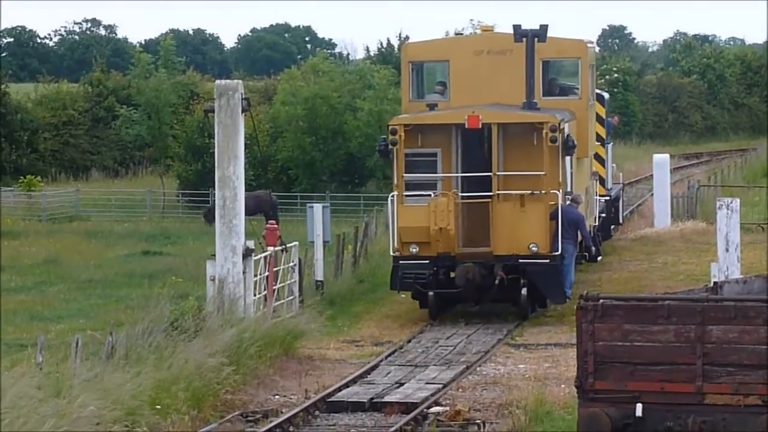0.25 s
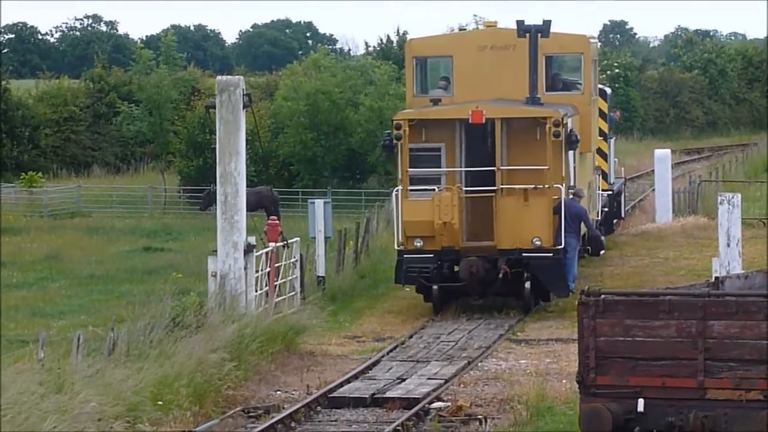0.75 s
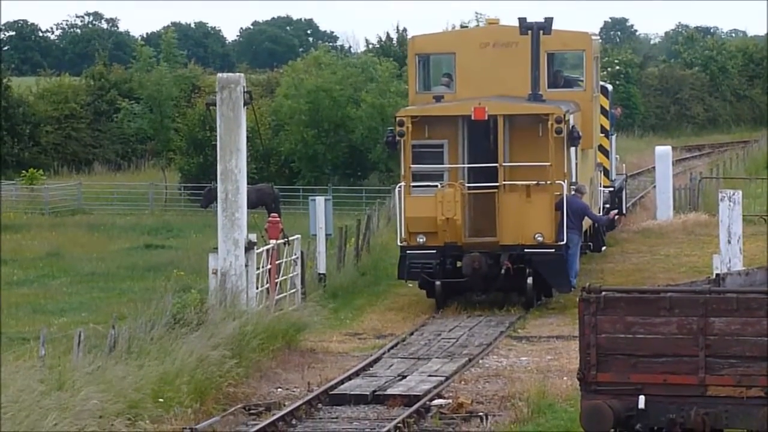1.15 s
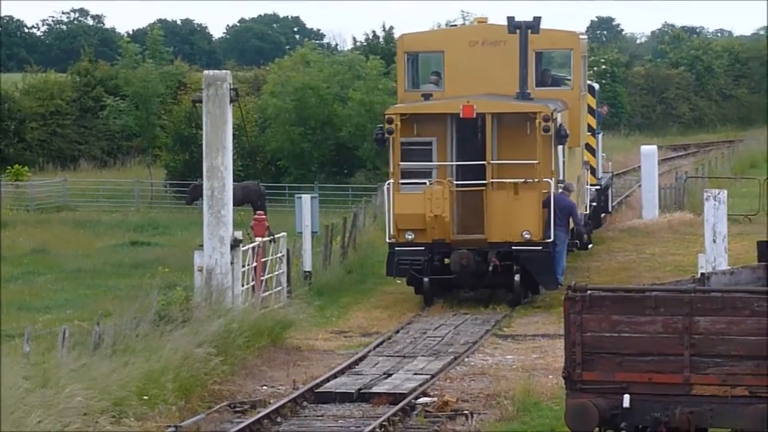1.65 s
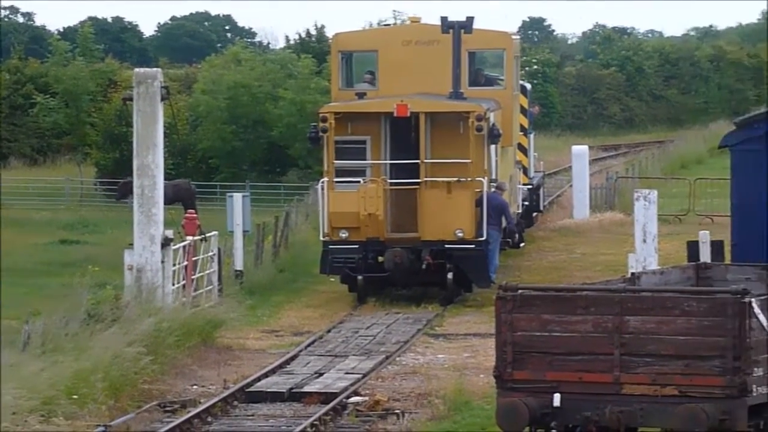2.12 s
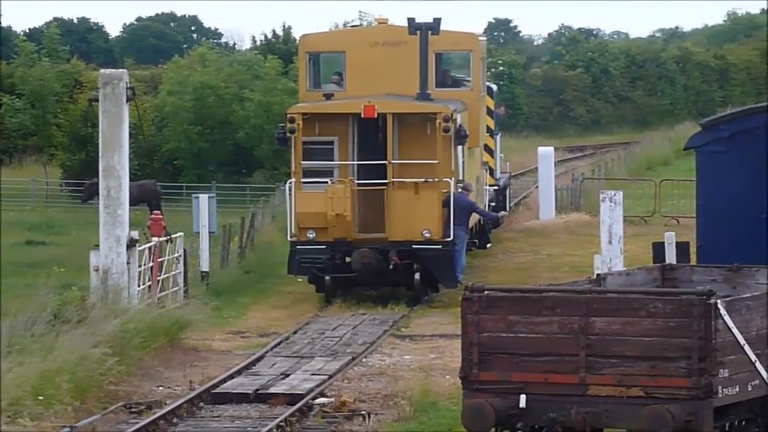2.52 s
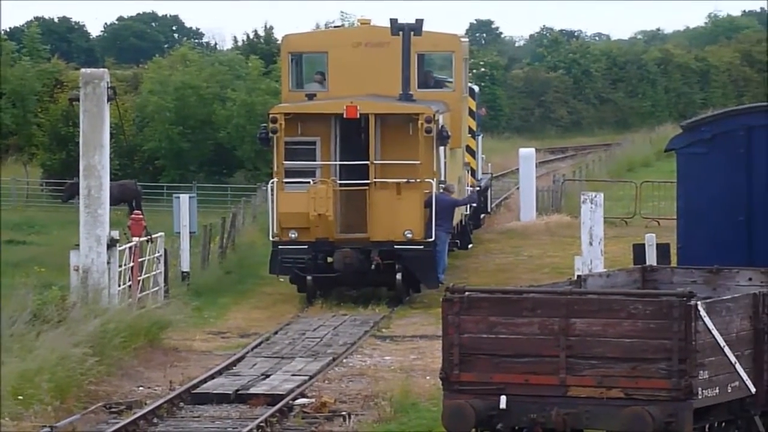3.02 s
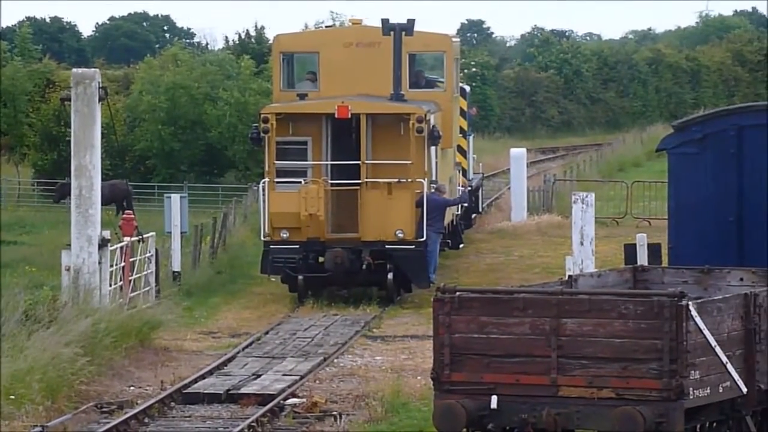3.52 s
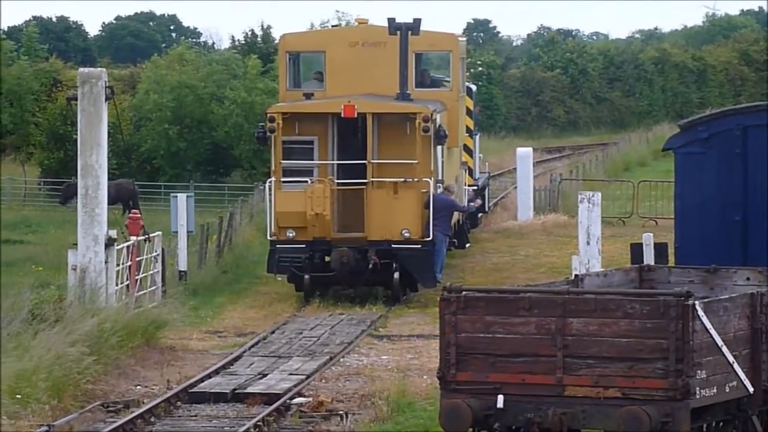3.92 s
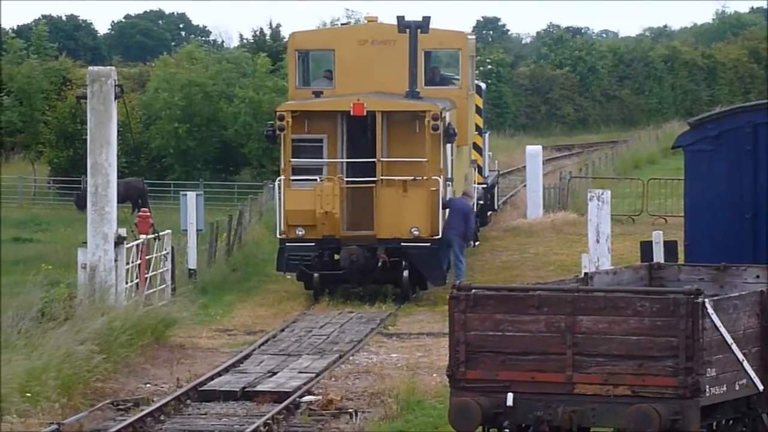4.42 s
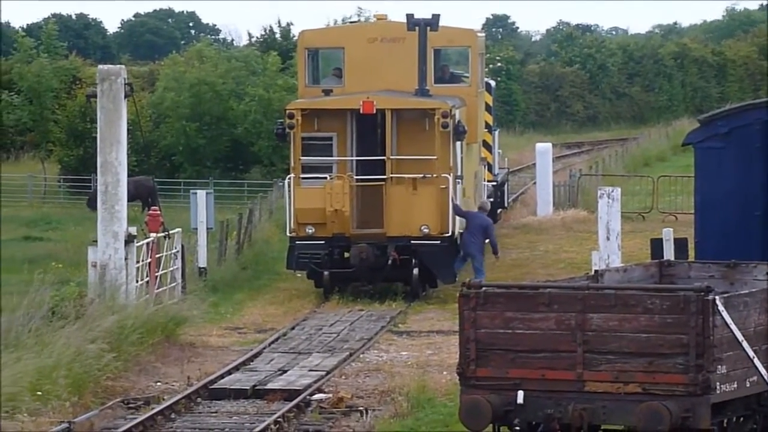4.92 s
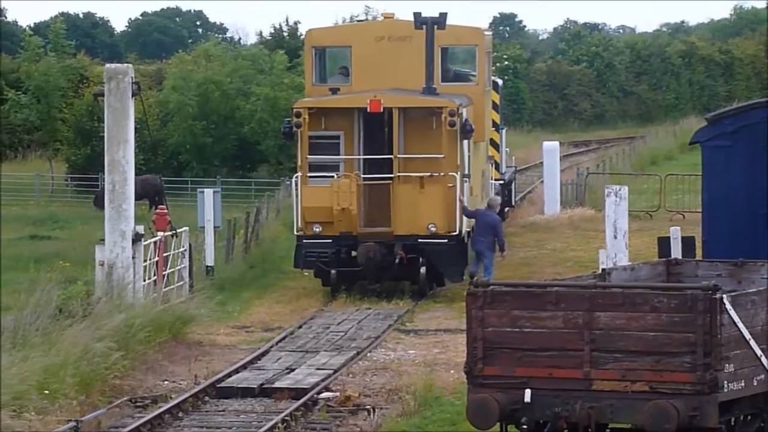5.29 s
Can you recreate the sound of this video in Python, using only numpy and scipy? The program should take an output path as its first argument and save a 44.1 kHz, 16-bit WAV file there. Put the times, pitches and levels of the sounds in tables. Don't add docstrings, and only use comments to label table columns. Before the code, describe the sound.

Faint air puffs, metallic rattles and clicks over a distant engine idle, then a loud, steady hiss of venting brake air from a standing locomotive.

```python
import sys
import numpy as np
from scipy import signal
from scipy.fft import rfft, irfft, next_fast_len
from scipy.io import wavfile
from scipy.ndimage import uniform_filter1d, map_coordinates

SR = 44100
rng = np.random.default_rng(int(sys.argv[2]) if len(sys.argv) > 2 else 0)


def generate_wav(signal):
    frames = np.transpose(np.atleast_2d(signal))
    scaled = np.clip(frames, -1, 1) * 32767
    pcm = np.round(scaled).astype(np.int16)
    wavfile.write(sys.argv[1], SR, pcm)


def magnitude_from_level(level_db):
    exponent = np.asarray(level_db, float) / 20
    return 10 ** exponent


N = 244755

# frequency in Hz, level in dB per Hz.
JET_SPECTRUM = [(180, -48.5), (300, -13.5), (383, -23), (475, -12.5), (597, -5.5), (684, -12.5), (1130, -4),
                (1380, -2), (2070, -5), (3410, 0), (5470, -9), (6520, -13), (7570, -35.5), (9840, -68),
                (16700, -120)]
LAYER_EDGES_HZ = (1200, 2100, 3050, 4200)
# cracked level in dB, open level in dB, overshoot in dB,
# loss as pressure falls in dB, lateness of that loss as an exponent.
JET_LAYERS = [
    (-39.5, -35, 1.5, 0, 1.5),
    (-40.5, -31, -2, 1.5, 2.4),
    (-39, -26.5, 0.5, 5, 3.7),
    (-38, -25.5, 2.5, 6, 1),
    (-45, -24, 3, 10.5, 0.28),
]
# frequency in Hz, #
# width in Hz, lift in dB (negative for a notch).
PIPE_MODES = [(466.7, 18, 9), (513, 49, 11), (684, 60, 18), (765, 21, 11), (966, 22, 5.5), (1480, 15, -2.5),
              (1616, 30, 13), (1696, 27, 1.5), (1770, 110, 0.5), (1910, 24, 11.5), (2262, 49, 7.5),
              (2400, 12, 9.5), (2547, 61, 8), (2690, 62, 3.5), (2780, 90, 1.5), (2854, 55, 7),
              (3480, 86, 4), (3814, 40, 6), (4310, 240, -3), (4926, 220, 6), (5325, 120, 7),
              (5860, 130, 2.5), (5860, 57, 3), (603, 51.6, -28.5), (1124, 62, -19), (1571, 36, -26),
              (2040, 320, -1.5), (3900, 71, 3)]
# delay in ms, level in dB.
ECHOES = [(.9, -20), (2.05, -21), (3.25, -34), (6.6, -20), (8.5, -17), (10.8, -14)]
# time in seconds, level in dB, frequency in Hz.
ORIFICE_TONE = [
    (1.75, -34.5, 3472),
    (2.24, -45.5, 3480),
    (5.55, -36, 3457),
]
# start in seconds, level in dB, hold in seconds.
WHISTLES = [
    (1.615, -39.5, .018),
    (1.684, -30.5, .02),
]
# frequency in Hz, level in dB.
SEAT_MODES = [(1400, 0), (2780, -1), (3300, -5), (5500, -20)]
# start in seconds, level in dB, length in seconds.
PRESSURE_STEP = (1.682, -50, .014)
# start in seconds, level in dB, hold in seconds.
LEAKS = [(.025, -44, 0.077)]
# start in seconds, level in dB, hold in seconds.
SPITS = [(.295, -48.5, 0.018), (.474, -54, 0.022)]
# frequency in Hz, level in dB per Hz.
THIN_SPECTRUM = [(1060, -39), (1800, -4), (2020, -15), (2600, -9.5), (3190, 4.5), (3680, 1.5), (4970, -4.5),
                 (6550, -18), (7570, -38.5), (9840, -75), (16700, -120)]
HOLLOW_SPECTRUM = [(710, -23), (1200, 0.5), (1350, -2.5), (1810, -3), (2070, -9.5), (2350, 6.5),
                   (3530, -17), (4200, -19), (5460, -50), (9240, -120)]
# start in seconds, level in dB, hold in seconds.
JOLTS = [(.192, -37.5, .022), (.245, -46, .008), (.385, -45, .022), (.485, -52, .015), (.575, -47, .015),
         (.77, -53, .01), (.948, -40, .055), (1.1, -50, .015), (1.22, -51, .005), (1.405, -45, .005),
         (1.52, -52, .005), (1.565, -51, .005)]
# time in seconds, peak in dB.
KNOCKS = [(1.079, -35), (1.177, -21)]
TICKS = [(0.4804, -30.5), (1.08, -45), (1.1454, -33), (1.1778, -27.5)]
# frequency in Hz, level in dB, 60 dB decay in seconds.
KNOCK_MODES = [(1230, -0.5, 0.0093), (1500, -7, 0.0045), (805, -8, 0.0094), (1080, -16, .04)]
TICK_MODES = [(3300, -1, .004), (2300, -5, .003), (4900, -2, .003), (6300, -7, .002)]
# frequency in Hz, level in dB per Hz.
YARD_SPECTRUM = [(15, -58), (25, -53), (124, -6.5), (242, -5), (293, -1.5), (420, -4.5), (710, -3),
                 (820, -4.5), (902, -2), (1150, -6), (3970, -17.5), (6400, -29), (7570, -50), (9840, -80.5),
                 (16700, -120)]
# time in seconds, level in dB.
YARD_LEVEL = [(0, -51), (1.1, -52), (1.6, -52.5), (2.8, -52), (5.55, -51.5)]
# time in seconds, length in seconds,
# threshold over the level of the band in dB.
DROPOUTS = [(.165, .02, -2), (.297, .025, 0), (1.29, .03, 1), (1.57, .025, -2), (1.698, .02, -3),
            (2.3, .025, 0), (2.372, .035, 3), (2.43, .02, -2), (2.47, .025, 0), (2.575, .03, 0),
            (3.21, .025, 0), (3.32, .025, 0), (4.03, .03, 1), (4.285, .03, 3), (4.33, .02, 0),
            (4.77, .03, 2)]


def vent():
    def colour(f):
        modes_db = sum(db / (1 + (2 * (f - hz) / width) ** 2) for hz, width, db in PIPE_MODES)
        comb = 1 + sum(magnitude_from_level(db) * np.exp(-2j * np.pi * f * ms / 1000) for ms, db in ECHOES)
        return magnitude_from_level(along(JET_SPECTRUM, f)) * magnitude_from_level(modes_db) * comb

    def power_below(f, edge):
        return 1 / (1 + (f / edge) ** 8)

    surge_db = 0.064 * wobble(15) + 0.29 * wobble(20)
    edges = (1, *LAYER_EDGES_HZ, SR)
    out = np.zeros(N)
    for layer, low, high in zip(JET_LAYERS, edges, edges[1:]):
        def band(f):
            share = (1 - power_below(f, low)) * power_below(f, high)
            return colour(f) * np.sqrt(share)
        out += flow(*layer) * magnitude_from_level(surge_db) * rush(band, patchy_db=0.32)
    return out


def flow(cracked_db, open_db, overshoot_db, lost_db, late):
    crack_s, crack_rise_s = 1.618, .025
    open_s, open_rise_s = 1.681, .009
    rush_s, drain_db_per_s = 0.027, 0.7648
    empty_s, empty_bend = 1.13, 2.54
    t = since(open_s + open_rise_s)
    opened = rise(open_s, open_rise_s)
    spent = 1 - np.exp(-(t / empty_s) ** empty_bend)
    blow_db = open_db + overshoot_db * np.exp(-t / rush_s) - lost_db * spent ** late - drain_db_per_s * t
    cracked = rise(crack_s, crack_rise_s) * (1 - opened) * magnitude_from_level(cracked_db)
    return cracked + opened * magnitude_from_level(blow_db)


def orifice():
    db, hz = curves(ORIFICE_TONE)
    turns = np.cumsum(hz) / SR + 0.34 * wobble(90)
    return magnitude_from_level(db + 3.2 * wobble(25)) * np.sin(2 * np.pi * turns)


def whistle():
    tones = sum(magnitude_from_level(db) * shaky(hz, turns=0.32) for hz, db in SEAT_MODES)
    return bursts(WHISTLES, rise_s=.008, fall_db_per_s=600) * tones


def thump():
    s, db, length = PRESSURE_STEP
    cycle = (np.arange(N) / SR - s) / length
    return magnitude_from_level(db) * np.sin(2 * np.pi * cycle) * (np.abs(cycle - .5) < .5)


def puff():
    leak = bursts(LEAKS, rise_s=0.037, fall_db_per_s=41)
    leak = leak * magnitude_from_level(-80 * since(.3))
    spits = bursts(SPITS, rise_s=.012, fall_db_per_s=300)
    spits = spits + magnitude_from_level(-9) * bursts(SPITS, rise_s=.012, fall_db_per_s=15)
    thin = rush(lambda f: magnitude_from_level(along(THIN_SPECTRUM, f)), patchy_db=0.5)
    hollow = rush(lambda f: magnitude_from_level(along(HOLLOW_SPECTRUM, f)), patchy_db=1.5)
    return (leak + magnitude_from_level(-3) * spits) * thin + (spits + magnitude_from_level(-7.5) * leak) * hollow


def bar():
    rest_hum = magnitude_from_level(-60 + 2.6 * wobble(11))
    shaken = bursts(JOLTS, rise_s=.005, fall_db_per_s=480) + rest_hum
    chatter = magnitude_from_level(-3.5 + 2.4 * wobble(60))
    return chatter * shaken * shaky(1007, turns=0.07)


def clicks():
    out = np.zeros(N)
    t = np.arange(SR // 20) / SR
    onset = 1 - np.exp(-t / 0.00048)
    for contacts, modes in (KNOCKS, KNOCK_MODES), (TICKS, TICK_MODES):
        ring = sum(magnitude_from_level(db - 60 * t / t60) * np.sin(2 * np.pi * hz * t) for hz, db, t60 in modes)
        for s, db in contacts:
            out[round(s * SR):][:len(t)] += magnitude_from_level(db + 6.0) * ring * onset
    return filtered(out, lambda f: (1j * f / (400 + 1j * f)) ** 2)


def yard():
    level_db = curves(YARD_LEVEL)[0] + 7.5 + 0.41 * wobble(8.6)
    return magnitude_from_level(level_db) * rush(lambda f: magnitude_from_level(along(YARD_SPECTRUM, f)), patchy_db=1.5)


def rush(response, patchy_db):
    z = signal.stft(rng.standard_normal(N + 512), nperseg=512)[2]
    field = uniform_filter1d(rng.standard_normal(z.shape), size=4, axis=0)
    field = uniform_filter1d(field, size=12, axis=1)
    patchy = signal.istft(z * magnitude_from_level(patchy_db * unit(field)), nperseg=512)[1][:N]
    return unit(filtered(patchy, response))


def shaky(hz, turns):
    return np.sqrt(2) * np.sin(2 * np.pi * (hz * np.arange(N) / SR + turns * wobble(40)))


def bursts(rows, rise_s, fall_db_per_s):
    out = np.zeros(N)
    for s, db, hold in rows:
        out += rise(s, rise_s) * magnitude_from_level(db - fall_db_per_s * since(s + rise_s + hold))
    return out


def rise(s, rise_s):
    return np.sin(np.pi / 2 * np.minimum(since(s) / rise_s, 1)) ** 2


def since(s):
    return np.maximum(np.arange(N) / SR - s, 0)


def wobble(rate):
    knots = rng.standard_normal(int(N * rate / SR) + 4)
    return map_coordinates(knots, [np.arange(N) * rate / SR])


def curves(rows):
    s, *columns = np.transpose(rows)
    return [np.interp(np.arange(N) / SR, s, c, left=-120, right=-120) for c in columns]


def along(points, hz):
    f, v = np.transpose(points)
    return np.interp(np.log(hz + 1), np.log(f + 1), v)


def filtered(x, response):
    m = next_fast_len(N + SR // 2)
    return irfft(rfft(x, m) * response(np.fft.rfftfreq(m, 1 / SR)), m)[..., :N]


def unit(x):
    return x / np.sqrt(np.mean(x ** 2) + 1e-20)


def scene():
    air = vent() + orifice() + whistle() + thump() + puff()
    return np.tile(air + bar() + clicks() + yard(), (2, 1))


def dropouts(x):
    hz, t, z = signal.stft(x, SR, nperseg=768, noverlap=640)
    size = np.abs(z)
    masking = uniform_filter1d(size, size=40, axis=0) ** .75 * size.max(axis=0) ** .25 * magnitude_from_level(-6)
    luck_db = 4 * rng.standard_normal((len(DROPOUTS), 120))
    band = (hz // 200).astype(int)
    for (s, length, over_db), band_db in zip(DROPOUTS, luck_db):
        near = np.abs(t - s) < length / 2
        threshold = masking[:, near] * magnitude_from_level(over_db + band_db[band])[:, None]
        z[:, near] *= 1 - .9 / (1 + (size[:, near] / (threshold + 1e-12)) ** 6)
    return signal.istft(z, SR, nperseg=768, noverlap=640)[1][:N]


def low_pass(x):
    return signal.sosfilt(signal.butter(12, 7720, fs=SR, output="sos"), x)


def record(dry):
    def camera(hz):
        band_limit = np.clip((7850 - hz) / 300, 0, 1)
        return band_limit * hz / (hz + 30)

    x = filtered(dropouts(dry[0]), camera)
    mix = np.tile(x, (2, 1))
    return low_pass(mix)


dry = scene()
out = record(dry)
generate_wav(out)
```